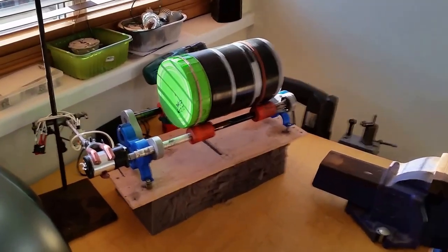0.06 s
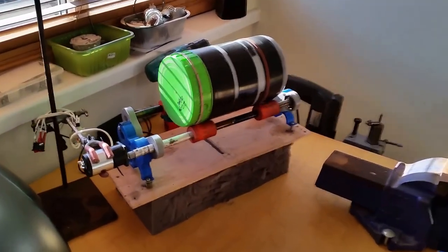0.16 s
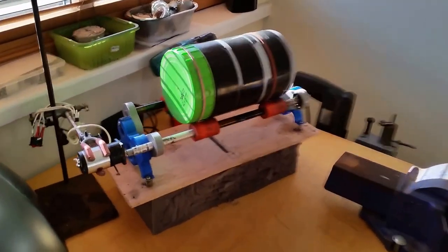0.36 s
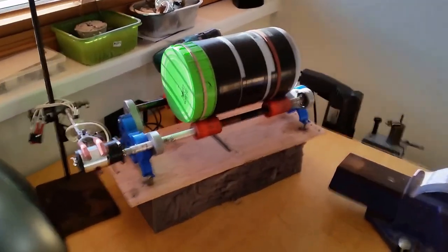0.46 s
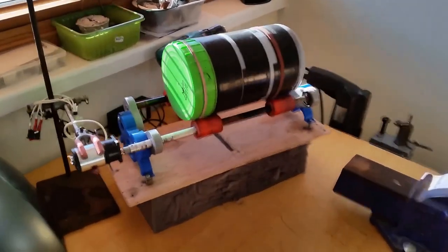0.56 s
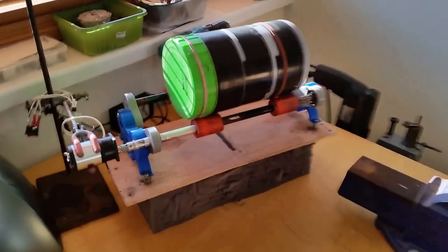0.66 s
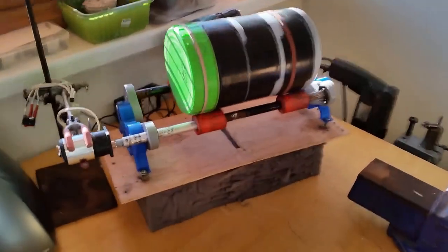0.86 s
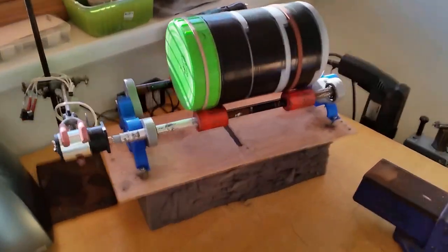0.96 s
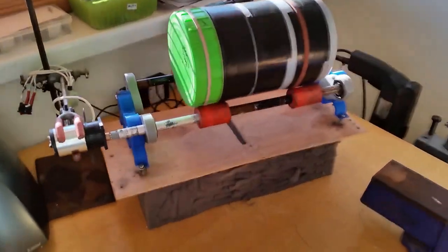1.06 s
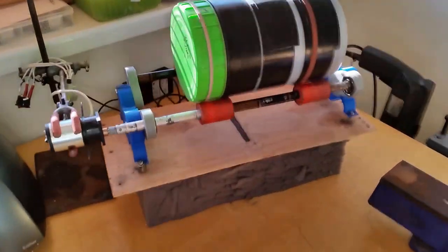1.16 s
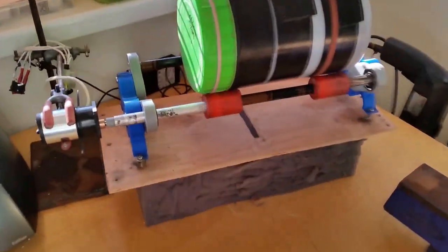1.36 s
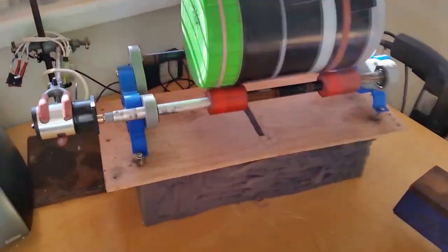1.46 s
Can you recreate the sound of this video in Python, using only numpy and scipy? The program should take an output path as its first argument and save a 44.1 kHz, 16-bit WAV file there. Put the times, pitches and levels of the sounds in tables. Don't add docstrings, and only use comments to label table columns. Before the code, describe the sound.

A motor-driven tumbling drum runs on a bench indoors, with buzzy whine, hissing grit and scraping stones. Low rumble and finger thumps shake the handheld microphone, heavier on the right. Stones clatter brightly around 0.3-0.4 seconds; a brief squeak and ticks come near 0.63. A hard, clipped knock hits right at 0.68, momentarily ducking the machine. From about 0.9 to 1.5 it is much fainter, with small scattered ticks.

```python
import sys
import numpy as np
from scipy import signal
from scipy.fft import rfft, irfft, next_fast_len
from scipy.io import wavfile

SR = 44100
rng = np.random.default_rng(int(sys.argv[2]) if len(sys.argv) > 2 else 0)


def transcribe(u):
    v = np.clip(np.atleast_2d(u).T, -1, 1)
    q = np.round(v * 32767).astype(np.int16)
    wavfile.write(sys.argv[1], SR, q)


def field_ratio(decibels):
    return 10 ** (np.asarray(decibels, dtype=float) / 20)


N = 66150


def rms_one(x):
    return x / np.sqrt(np.mean(x ** 2) + 1e-20)


def in_time(rows):
    s, *columns = np.transpose(rows)
    return [np.interp(np.arange(N) / SR, s, c) for c in columns]


def at_hz(points, hz):
    point_hz, point_db = np.array(points).T[:2]
    return np.interp(np.log(hz), np.log(point_hz), point_db)


def drift(rate_hz):
    step = 40
    warm_up = 2000
    r = np.exp(-2 * np.pi * rate_hz * step / SR)
    noise = rng.standard_normal(N // step + warm_up + 2)
    slow = signal.lfilter([1], [1, -2 * r, r * r], noise)[warm_up:]
    return np.interp(np.arange(N) / step, np.arange(len(slow)), rms_one(slow))


def colour(x, points):
    size = next_fast_len(N + 8192)
    hz = np.arange(size // 2 + 1) * SR / size + 1
    return irfft(rfft(x, size) * field_ratio(at_hz(points, hz)), size)[:N]


def patchy(x, low_hz, patchy_db, rate_hz):
    out = 0
    together = drift(rate_hz)
    spectrum = rfft(x)
    hz = np.arange(len(spectrum)) * SR / N + 1
    place = np.clip(2 * np.log2(hz / low_hz), 0, 9)
    for k in range(10):
        weight = np.cos(np.pi / 2 * np.clip(place - k, -1, 1)) ** 2
        band = irfft(spectrum * weight, N)
        out = out + band * field_ratio(patchy_db * (0.92 * together + drift(rate_hz)))
    return out


def grains(per_s, share):
    spread_db = 1
    sizes = field_ratio(spread_db * np.minimum(rng.exponential(1, N), 3.0)) * rng.choice([-1, 1], N)
    impacts = rms_one(sizes * (rng.random(N) < per_s / SR))
    share = np.clip(share, 0, 1)
    return np.sqrt(share) * impacts + np.sqrt(1 - share) * rng.standard_normal(N)


def rumble():
    # t/s, left level/dB, right level/dB
    shake = [(0, -44.5, -52.5), (.25, -41, -43.5), (.45, -43, -49.5), (.6, -36.5, -36), (.67, -47, -29),
             (.72, -54, -46.5), (.9, -49, -46.5), (1.1, -54.5, -51), (1.3, -61, -61.5), (1.5, -58, -56.5)]
    # f/Hz, density/dB per Hz
    rumble_spectrum = [(25, -7.5), (80, -2.5), (150, -3.5), (260, -13), (380, -15.5), (700, -21.5),
                       (1100, -27), (2000, -45.5)]
    sides = []
    for level_db in in_time(shake):
        lumpy = patchy(rng.standard_normal(N), 23.6, patchy_db=3.5, rate_hz=15.8)
        noise = lumpy + 0.5 * rng.standard_normal(N)
        sides.append(field_ratio(level_db) * rms_one(colour(noise, rumble_spectrum)))
    return np.array(sides)


def thumps(rows, rise_cycles, fall_cycles):
    out = np.zeros(N)
    t = np.arange(N) / SR
    for s, db, hz, way in rows:
        near = slice(max(int((s - 0.05) * SR), 0), int((s + 0.05) * SR))
        cycles = (t[near] - s) * hz
        width = np.where(cycles < 0, rise_cycles, fall_cycles)
        swing = np.cos(2 * np.pi * cycles) * np.exp(-(cycles / width) ** 2)
        out[near] += np.sign(way) * field_ratio(db) * swing
    return out


def knock():
    knock_s, press_s, press_db = 0.68093, 0.00111, -6.3
    shell_hz, shell_db, shell_decay_s = 150, 14.9, 0.00119
    grip_hz, grip_db, grip_decay_s = 66.3, 8.6, 0.00352
    overload, cut_hz = 0.96, 8900
    t = np.arange(N) / SR - knock_s
    after = np.maximum(t, 0)
    press = field_ratio(press_db) * np.clip(1 + t / press_s, 0, 1)
    shell = field_ratio(shell_db) * np.cos(2 * np.pi * shell_hz * after) * np.exp(-after / shell_decay_s)
    grip = field_ratio(grip_db) * np.cos(2 * np.pi * grip_hz * after) * np.exp(-after / grip_decay_s)
    blow = np.clip(np.where(t < 0, press, shell - grip), -overload, overload)
    return signal.sosfilt(signal.butter(2, cut_hz, fs=SR, output="sos"), blow)


def handling():
    # t/s, peak level/dB, f/Hz, direction/sign
    left_thumps = [(0.0073, -40, 97, 1), (0.0268, -32, 91, -1), (0.0467, -36, 91, -1),
                   (0.073, -37, 120, -1), (0.2354, -32, 79, 1), (0.2653, -28, 105, 1),
                   (0.2952, -29, 105, 1), (0.3088, -29, 226, -1), (0.3116, -29, 85, 1),
                   (0.3429, -29, 183, 1), (0.473, -28, 300, -1), (0.4753, -28, 129, 1),
                   (0.5156, -28, 112, 1), (0.5683, -30, 243, -1), (0.571, -26, 129, 1),
                   (0.5819, -27, 226, 1), (0.5828, -24, 120, 1), (0.6218, -34, 69, -1),
                   (0.6816, -29, 226, -1), (0.683, -35, 91, 1), (0.7147, -26, 149, -1),
                   (0.7243, -34, 64, -1), (0.7383, -42, 85, -1), (0.8159, -43, 105, 1),
                   (0.8259, -42, 112, -1), (0.8444, -38, 105, -1), (0.8608, -40, 105, -1),
                   (0.8853, -41, 171, -1), (1.0163, -42, 120, -1), (1.0299, -43, 105, -1),
                   (1.0517, -41, 97, -1), (1.0689, -40, 197, 1), (1.0771, -39, 79, 1),
                   (1.0807, -45, 197, 1), (1.176, -47, 79, 1), (1.1905, -45, 243, -1),
                   (1.1932, -45, 105, 1), (1.4349, -48, 171, 1), (1.4413, -42, 91, -1),
                   (1.4476, -44, 211, -1)]
    # t/s, peak level/dB, f/Hz, direction/sign
    right_thumps = [(0.01, -34, 97, 1), (0.0322, -33, 74, -1), (0.0834, -25, 64, 1), (0.1592, -30, 120, -1),
                    (0.1746, -25, 91, -1), (0.2218, -11, 105, 1), (0.2395, -31, 45, 1),
                    (0.2658, -23, 85, -1), (0.2952, -24, 97, -1), (0.3088, -24, 211, 1),
                    (0.3098, -23, 60, -1), (0.3433, -26, 159, 1), (0.3542, -22, 79, 1),
                    (0.3905, -29, 85, -1), (0.3937, -17, 105, 1), (0.4363, -29, 52, 1),
                    (0.468, -16, 120, 1), (0.4834, -24, 79, 1), (0.5002, -29, 120, -1),
                    (0.5066, -24, 183, -1), (0.5152, -21, 74, -1), (0.5669, -30, 48, -1),
                    (0.5705, -23, 211, -1), (0.5846, -17, 74, -1), (0.5968, -27, 129, -1),
                    (0.6177, -22, 91, 1), (0.6444, -32, 56, 1), (0.6753, -25, 211, 1),
                    (0.7179, -33, 105, -1), (0.9088, -37, 112, 1), (1.0122, -41, 139, -1),
                    (1.0512, -39, 85, 1), (1.0771, -37, 74, -1), (1.1052, -44, 56, 1),
                    (1.1737, -44, 56, -1), (1.1891, -40, 52, -1), (1.19, -41, 129, 1),
                    (1.2503, -44, 52, -1), (1.2825, -42, 64, -1), (1.3274, -42, 60, -1),
                    (1.3705, -48, 48, 1), (1.4358, -42, 97, -1), (1.4476, -42, 197, 1),
                    (1.4485, -39, 64, -1)]
    # t/s, peak level/dB, f/Hz, direction/sign
    settling = [
        (.6807, -20, 3600, 1),
        (.6945, -21, 75, -1),
    ]
    left = thumps(left_thumps, rise_cycles=0.24, fall_cycles=0.95)
    right = thumps(right_thumps + settling, rise_cycles=0.37, fall_cycles=1)
    return np.array([left, right + knock()])


def duck():
    start_s, depth_db, hold_s = 0.672, -7.5, 0.023
    since = (np.arange(N) / SR - start_s) / hold_s
    return field_ratio(depth_db * np.clip(10 * since, 0, 1) * np.exp(-np.maximum(since, 0) ** 4))


def motor():
    # t/s, slot rate f/Hz, level/dB
    motor_run = [(0, 645.6, -51), (.2, 643.5, -47.5), (.3, 665.4, -45.5), (.45, 662.5, -46.5),
                 (.65, 666.1, -46.5), (.69, 658.5, -52), (.85, 650.8, -57), (1.0, 654.4, -59.5),
                 (1.15, 655.4, -69), (1.3, 668, -67.5), (1.5, 658, -66)]
    # multiple of slot rate, level/dB
    overtones = [(2, -3.5), (3, -0.5), (4, 1), (5, -4.5), (7, -4.5), (8, -1), (9, -0.5), (10, -3.5)]
    # t/s, f/Hz, level/dB
    squeak_rows = [
        (.4, 2640, -50),
        (0.624, 2650, -37),
        (.645, 2675, -43),
        (.74, 2730, -47),
        (.765, 2646, -47),
        (.96, 2600, -54),
        (1.206, 2678, -57.5),
        (1.322, 2680, -55),
        (1.447, 2664, -57.5),
        (1.496, 2690, -56.5),
    ]
    flutter_db, flutter_hz = 3.2, 18.0
    wobble, wobble_hz = 0.006, 19.96
    blur_rad, blur_hz = 1.0, 50.0
    hum_multiple, hum_db, squeak_s = 0.4, -9.5, 0.011
    t = np.arange(N) / SR
    slot_hz, level_db = in_time(motor_run)
    turns = np.cumsum(slot_hz * (1 + wobble * drift(wobble_hz))) / SR
    whine = np.zeros((2, N))
    for side in whine:
        for multiple, db in overtones:
            level = field_ratio(db + flutter_db * drift(flutter_hz))
            cycles = np.round(multiple) * turns + rng.random()
            side += level * np.sin(2 * np.pi * cycles + blur_rad * drift(blur_hz))
    hum_level = field_ratio(hum_db + 3.2 * drift(14.7))
    hum = hum_level * np.sin(2 * np.pi * hum_multiple * turns + 0.99 * drift(24.0))
    squeaks = np.zeros(N)
    for s, hz, db in squeak_rows:
        squeaks += field_ratio(db + 1.5) * np.exp(-((t - s) / squeak_s) ** 2) * np.sin(2 * np.pi * hz * t)
    return field_ratio(level_db) * (whine + hum) + squeaks


def load():
    # t/s, grit level/dB, scrape level/dB re grit
    slide = [(0, -44, -4.5), (.05, -41.5, -14.5), (.085, -44.5, -7.5), (.27, -43.5, -7), (.305, -38, -17),
             (.336, -36.5, -10.5), (.36, -39.5, -18), (.396, -35, -19), (.438, -42, -10.5),
             (.584, -43.5, -8.5), (.646, -41.5, -1), (.67, -47.5, -1), (.726, -49, 1), (.93, -58.5, -21.5),
             (.96, -56, -2), (1.06, -58, -15.5), (1.144, -60.5, -25), (1.5, -61.5, -8)]
    # f/Hz, density/dB per Hz
    grit_spectrum = [(700, -20.5), (1600, -8), (2500, -4), (4500, 0.5), (7500, -3.5), (10000, -3.5),
                     (11500, -4.5), (15500, -15.5)]
    # f/Hz, density/dB per Hz
    scrape_spectrum = [(700, 17), (1500, 18.5), (2100, 23), (3000, 12.5), (4500, 10), (7000, 17),
                       (16000, -46.5)]
    grit_db, scrape_db = in_time(slide)
    sides = []
    for _ in range(2):
        grit = patchy(grains(per_s=2700, share=0.45), 700.0, patchy_db=1.65, rate_hz=17.0)
        scrape = patchy(grains(per_s=280, share=0.61), 470.0, patchy_db=3.5, rate_hz=30.0)
        grit = rms_one(colour(grit, grit_spectrum))
        scrape = rms_one(colour(scrape, scrape_spectrum))
        sides.append(grit + field_ratio(scrape_db) * scrape)
    return field_ratio(grit_db + 5.5) * np.array(sides)


def ticks():
    # t/s, ring level/dB, ring f/Hz, crack level/dB re ring
    tick_rows = [(.2992, -33, 10200, 0), (.3315, -21.5, 2240, -20), (0.338, -29, 2520, -20),
                 (.343, -23.5, 2200, -20), (.3505, -32, 9000, -9), (0.3712, -20, 7000, 0),
                 (.3885, -29, 4900, -11), (.3942, -21.5, 9400, 2.5), (.4035, -30, 2620, -11),
                 (.4078, -30, 4600, -7.5), (0.639, -25, 3760, -8), (0.639, -24.5, 4800, -7),
                 (.9489, -42, 6400, -5), (.9664, -36, 5800, 2.5), (1.0568, -35, 6950, 4),
                 (1.0578, -36.5, 4330, 8), (1.06, -37, 5370, 2), (1.0632, -41, 10100, 4),
                 (1.0866, -36.5, 8460, 5), (1.104, -38, 6940, 1), (1.118, -43, 4995, -1),
                 (1.2435, -50.5, 1509, 0.5), (1.2805, -44.5, 2352, 2), (1.2825, -48.5, 1320, -1.5),
                 (1.3495, -37, 4580, 3.5), (1.364, -47.5, 2400, -11), (1.39, -37.5, 4830, -6),
                 (1.408, -41.5, 4470, 0), (1.412, -44.5, 2493, -3), (1.4152, -42, 2950, -8.5),
                 (1.4661, -38, 10780, -0.5)]
    # f/Hz, density/dB per Hz
    crack_spectrum = [(1500, -33.5), (3500, -12.5), (4500, -3), (7500, -6.5), (10000, 4.5), (13000, -8)]
    ring_t60_cycles, longest_t60_s, rise_s = 37, 0.0095, 0.00045
    crack_t60_s, tail_db, tail_s = 0.0036, -19.5, 0.022
    ring = np.zeros(N + SR)
    crack = np.zeros((2, N + SR))
    t = np.arange(1500) / SR
    rise = np.minimum(t / rise_s, 1)
    crack_decay = field_ratio(-60 * t / crack_t60_s) + field_ratio(tail_db) * np.exp(-t / tail_s)
    for s, db, hz, crack_db in tick_rows:
        span = slice(int(s * SR), int(s * SR) + len(t))
        t60_s = min(ring_t60_cycles / hz, longest_t60_s)
        ring[span] += field_ratio(db - 60 * t / t60_s) * np.sin(2 * np.pi * hz * t) * rise
        noise = rng.standard_normal((2, len(t)))
        crack[:, span] += field_ratio(db + crack_db + 5.0) * noise * rise * crack_decay
    return ring[:N] + np.array([colour(c[:N], crack_spectrum) for c in crack])


def scene():
    # f/Hz, gain/dB
    right_port = [(300, 11.5), (1000, -3), (2500, -7.5), (3500, -11.5), (6000, -31.5), (8300, -12.5),
                  (10600, 4), (14000, 2)]
    left, right = (motor() + load() + ticks()) * duck()
    air = np.array([left, colour(right, right_port)])
    return air + rumble() + handling()


def band_limit(x):
    return signal.sosfilt(signal.butter(12, 16400, fs=SR, output="sos"), x)


def record(dry):
    top_cut = signal.ellip(10, 0.3, 42, 15850, fs=SR, output="sos")
    mix = signal.sosfilt(top_cut, np.clip(dry, -1, 1))
    return band_limit(mix)


dry = scene()
out = record(dry)
transcribe(out)
```